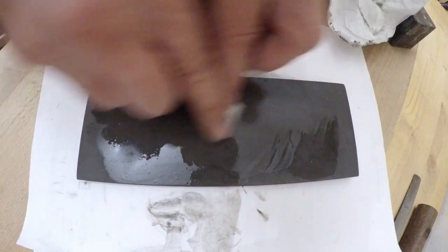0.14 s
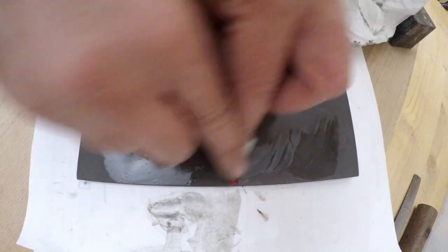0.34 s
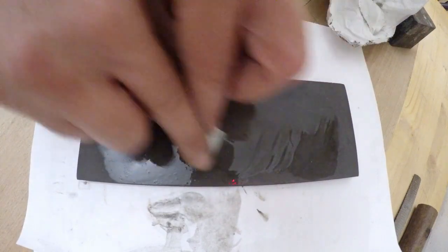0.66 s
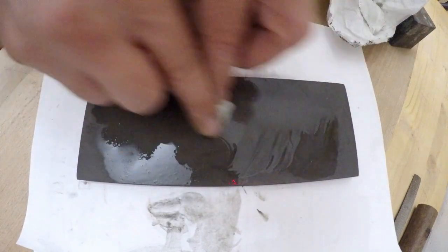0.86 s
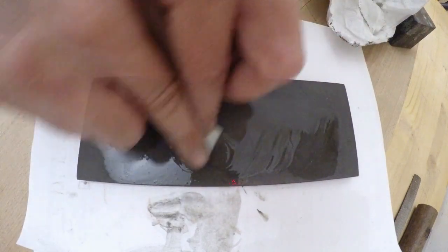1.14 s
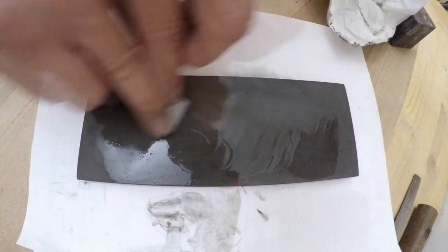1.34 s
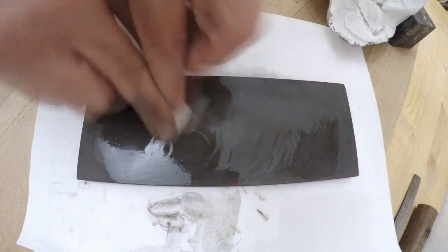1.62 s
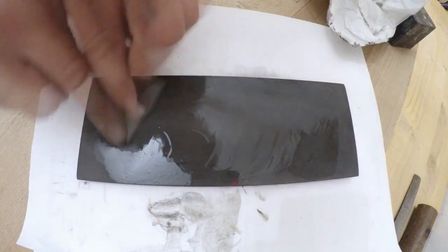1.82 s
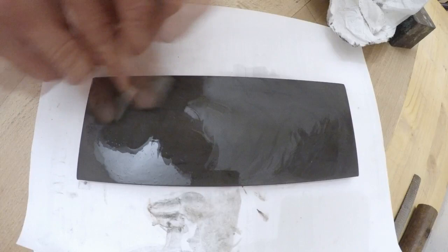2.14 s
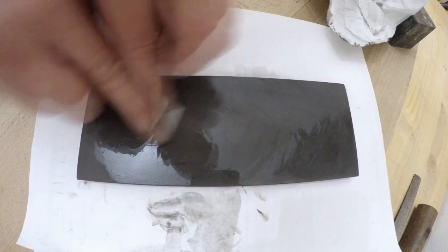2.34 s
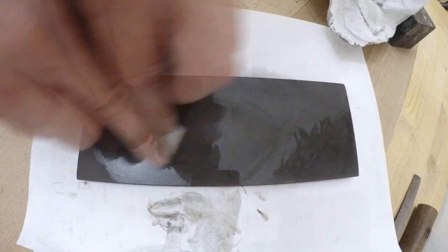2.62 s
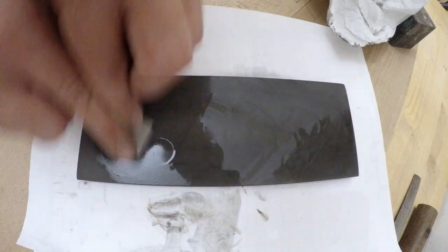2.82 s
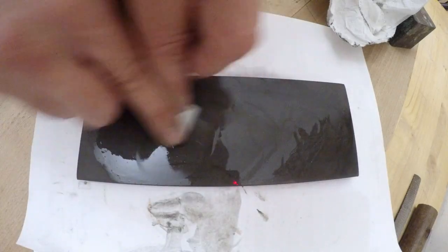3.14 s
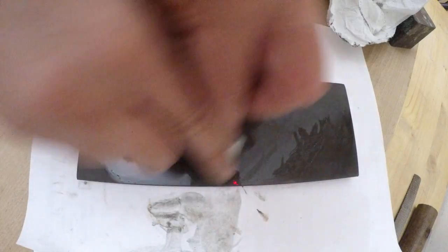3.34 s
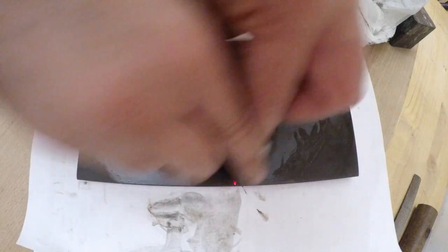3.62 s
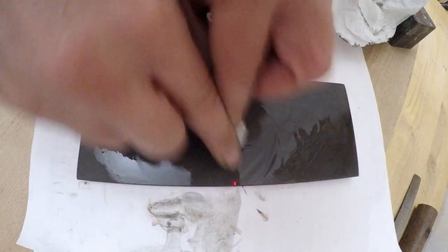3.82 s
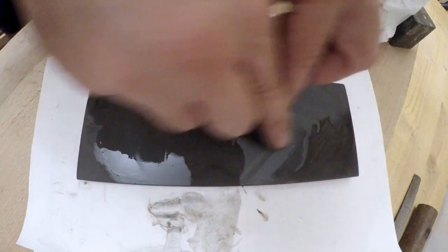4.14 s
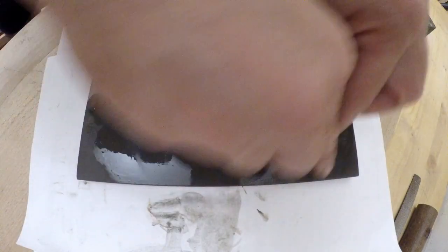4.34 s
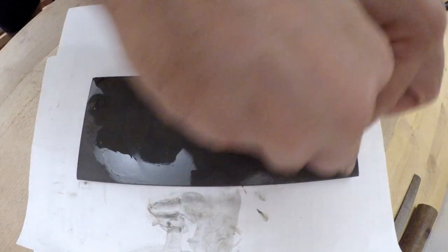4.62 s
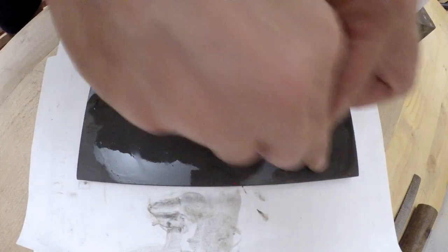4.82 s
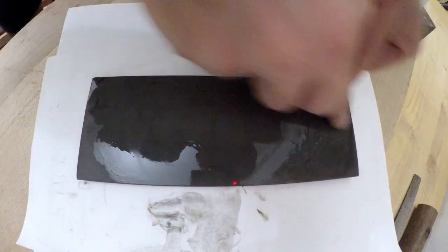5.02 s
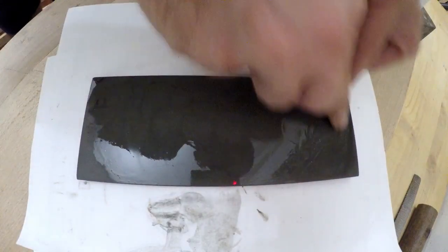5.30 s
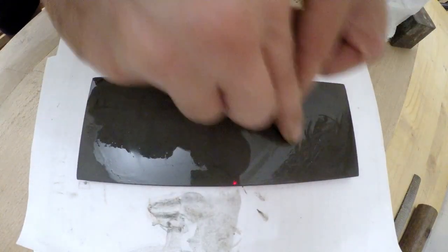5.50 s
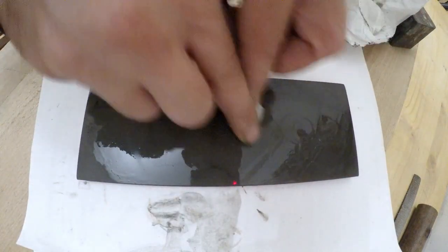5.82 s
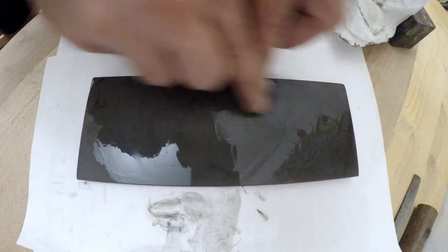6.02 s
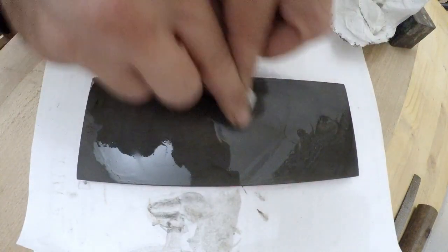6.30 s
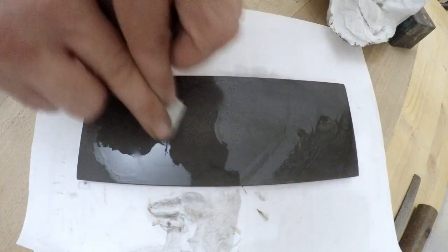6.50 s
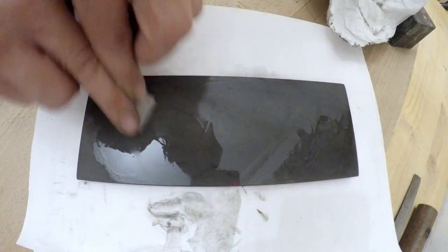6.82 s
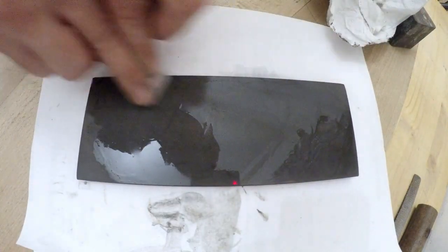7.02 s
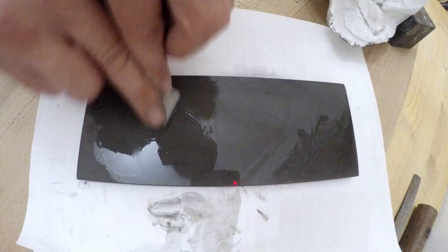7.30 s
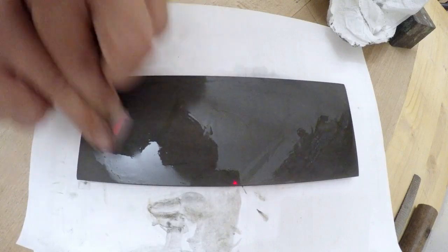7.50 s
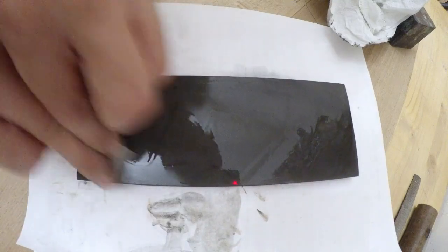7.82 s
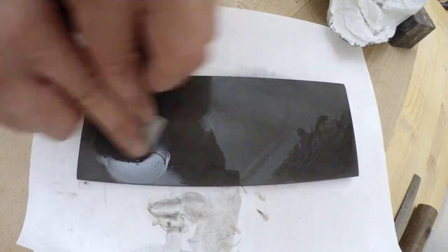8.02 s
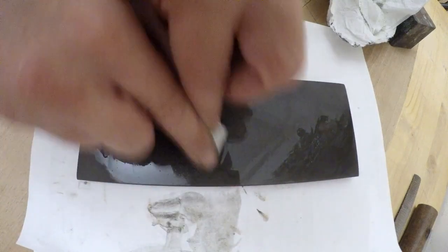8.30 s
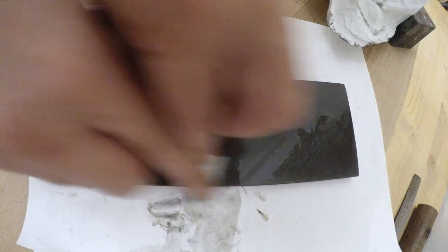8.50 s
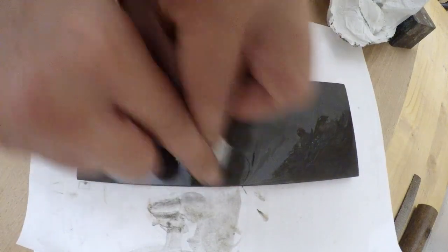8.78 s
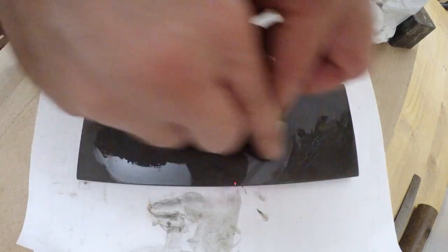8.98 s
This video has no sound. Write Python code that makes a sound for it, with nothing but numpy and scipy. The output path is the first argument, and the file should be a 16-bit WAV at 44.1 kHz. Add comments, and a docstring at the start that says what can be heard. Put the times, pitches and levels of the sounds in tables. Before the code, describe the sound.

Very close, a small steel blade is rubbed on a wet sharpening stone at about three strokes a second. Each push and return gives a bright hiss, a scrape and a nasal rasp, with thin metallic ringing. Around the middle the edge digs in harshly and squeals; later it chirps sharply. Beneath lie soft low thrums of the bench and a faint quiet-room rumble. Dry, centred sound.

```python
"""Grit hisses and rasps, close by: a small steel blade is rubbed on a wet sharpening stone, about 3 strokes/s.
Hiss, scrape and rasp are filtered grain noise; it rings the blade's modes, and the stone adds a low note.
Hands above the stone return a short, moving echo. Bench and room hum faintly: resonant and filtered noise.
Now and then the edge digs in, chatters or squeals (noise bursts, mode bursts); thrums shake the bench."""
import sys
import numpy as np
from scipy import signal
from scipy.fft import rfft, irfft, next_fast_len
from scipy.io import wavfile
from scipy.ndimage import uniform_filter1d, map_coordinates

SR = 44100
rng = np.random.default_rng(int(sys.argv[2]) if len(sys.argv) > 2 else 0)


def inscribe(sig):
    """Save sig as 16-bit PCM at rate SR to the path in sys.argv[1].

    A 1-D sig is mono; a 2-D sig holds one channel per row.
    Samples are clipped to [-1, 1] before scaling.
    """
    pcm = np.round(np.clip(np.atleast_2d(sig).T, -1, 1) * 32767)
    wavfile.write(sys.argv[1], SR, pcm.astype(np.int16))


N = 403515
TIME = np.arange(N) / SR


def gain_of(db):
    """Decibels to amplitude."""
    return 10 ** (np.asarray(db) / 20)


def evened(x):
    """Scales to unit rms."""
    return x / np.sqrt(np.mean(x ** 2) + 1e-20)


def noise():
    """White noise of unit variance."""
    return rng.standard_normal(N)


def follow(rows):
    """Columns of a curve table, interpolated at every sample."""
    s, *columns = np.transpose(rows)
    return [np.interp(TIME, s, c) for c in columns]


def colour(x, points):
    """Filters by a gain curve drawn on a log-frequency axis; unit rms."""
    hz, db = np.transpose(points)
    size = next_fast_len(N)
    bin_hz = np.fft.rfftfreq(size, 1 / SR)
    gain = gain_of(np.interp(np.log(bin_hz + 1), np.log(hz), db))
    return evened(irfft(rfft(x, size) * gain, size)[:N])


def wander(rate_hz):
    """Smooth random curve of unit rms, rate_hz random knots per second."""
    knots = rng.standard_normal(16384)
    coarse_s = TIME[::16]
    curve = map_coordinates(knots, [coarse_s * rate_hz], order=3, mode="wrap")
    return evened(np.interp(TIME, coarse_s, curve))


def uneven_gain(depth_db, rate_hz):
    """Random gain of unit rms, wandering by depth_db rms."""
    return evened(gain_of(depth_db * wander(rate_hz)))


def resonate(x, hz, width_hz):
    """Two-pole ringing mode that keeps the rms of white noise."""
    r = np.exp(-np.pi * width_hz / SR)
    zeros = np.array([1, 0, -1]) * np.sqrt((1 - r * r) / 2)
    poles = [1, -2 * r * np.cos(2 * np.pi * hz / SR), r * r]
    return signal.lfilter(zeros, poles, x)


def band(hz, width_hz):
    """Noise through one resonance twice: a fuzzy tone with steep sides."""
    once = resonate(noise(), hz, width_hz)
    return evened(resonate(once, hz, width_hz))


def held(x, hz, width_hz):
    """Mode kept going by steady rubbing: drifting phase, strength partly levelled."""
    ring = evened(resonate(x, hz, width_hz))
    power = uniform_filter1d(ring ** 2, size=1300)
    return evened(ring / np.sqrt(power + .3))


def swell(s, db, half_s):
    """Bell-shaped burst of force; half_s is the bell's standard deviation."""
    return gain_of(db) * np.exp(-.5 * ((TIME - s) / half_s) ** 2)


def bursts(rows):
    """Sum of the bells in a burst table."""
    return sum(swell(*row) for row in rows)


def swells(times, db, half_s, rest_db):
    """Level in dB of bells added in power to a resting level."""
    coarse_s = TIME[::64]
    bells = gain_of(db) * np.exp(-.5 * ((coarse_s[:, None] - times) / half_s) ** 2)
    power = (bells ** 2).sum(1) + gain_of(rest_db) ** 2
    return np.interp(TIME, coarse_s, 10 * np.log10(power))


def push_and_return(push, back, rest_db):
    """Level in dB over all strokes; push and back are each (times s, level dB, half length s)."""
    both = np.hstack([np.broadcast_arrays(*push), np.broadcast_arrays(*back)])
    return swells(*both, rest_db)


def grit(grains_per_s, spread_db, grain_db):
    """Dense fine abrasive grains, with sparser coarse ones of uneven size among them."""
    size = gain_of(spread_db * np.minimum(rng.exponential(1, N), 4))
    coarse = size * rng.choice([-1, 1], N) * (rng.random(N) < grains_per_s / SR)
    return evened(noise() + gain_of(grain_db) * evened(coarse))


RETURN_SHARE, LAST_STROKE_S = 0.55, .33  # return at this share of the way to the next push


def return_times(push_s):
    """When the blade comes back after each push, in s."""
    return push_s + RETURN_SHARE * np.diff(push_s, append=push_s[-1] + LAST_STROKE_S)


PUSH_HALF_S, RETURN_HALF_S, RETURN_SCRAPE_DB, REST_SCRAPE_DB = 0.048, 0.057, -59.5, -64
BITE_LAG_S, BITE_HALF_S, DRAG_HALF_S, REST_BITE_DB = 0.017, 0.06, 0.15, -53.5
RING_HALF_S, RETURN_RING_HALF_S, RETURN_RING_DB, REST_RING_DB = 0.043, 0.077, -3.5, -61.5
UPPER_LAG_S, UPPER_HALF_S, UPPER_RETURN_HALF_S, UPPER_RETURN_DB, REST_UPPER_DB = .015, .055, .09, -5, -82
STONE_LAG_S, STONE_RETURN_LAG_S, STONE_HALF_S, REST_STONE_DB = 0.021, 0.0039, 0.051, -88
REST_HISS_DB = -47  # where the hand turns
# push and return of the blade; levels are bell peaks before each source's trim: t/s, scrape/dB, bite/dB,
# main ring/dB, upper ring/dB, stone note/dB, return stone note/dB, return drag/dB, hiss/dB,
# lag of fastest sliding/s, half length of sliding/s
STROKE_ROWS = [(-0.08,-57,-46,-54.5,-62,-58,-70.5,-49,-44,.24,.04),
               (0.3,-48,-44,-66,-52.5,-62,-64,-48,-44,0.057,.04),
               (0.7,-53,-49.5,-81,-57,-65,-63,-79,-49.5,0.073,0.43),
               (1.06,-54,-49.5,-55,-57.5,-69,-62,-55,-45.5,0.32,0.19),
               (1.47,-54,-52,-48,-68,-68,-65.5,-48.5,-44.5,0.28,0.058),
               (1.87,-58,-48,-47.5,-76,-75,-67,-49,-43,.23,0.12),
               (2.26,-53,-49,-46,-76,-67,-74.5,-46.5,-42.5,0.1,0.2),
               (2.61,-55,-52,-45,-75,-65,-70,-56,-43.5,0.11,0.088),
               (2.91,-53.5,-51.5,-46.5,-65,-66.5,-72,-68,-42,0.095,.12),
               (3.25,-50.5,-48,-45.5,-59.5,-60,-65.5,-55,-42,0.091,0.11),
               (3.6,-49.5,-48,-60,-53,-65,-69,-53,-44,0.045,0.12),
               (3.93,-54,-45,-49.5,-58.5,-62.5,-75,-48,-42,0.03,.07),
               (4.25,-52.5,-45,-43.5,-61,-71.5,-69.5,-49,-45,0.053,0.25),
               (4.64,-49.5,-38,-44.5,-53,-57,-64.5,-50,-46.5,0.12,0.29),
               (4.97,-58,-38.5,-44,-50.5,-58.5,-70,-51,-45,0.092,0.13),
               (5.32,-61,-49,-62,-58,-55.5,-63,-53,-43.5,0.082,.11),
               (5.55,-72,-53,-48,-74,-67,-69,-48.5,-41,.13,0.1),
               (5.89,-56.5,-70,-46.5,-65,-73,-65.5,-48.5,-43,0.11,0.092),
               (6.21,-54.5,-50,-61,-60,-67.5,-63.5,-48.5,-42,0.15,0.087),
               (6.55,-54,-48,-50,-64,-66,-65.5,-48,-41.5,.12,0.082),
               (6.89,-58,-48.5,-52.5,-78,-76,-75,-46,-44,.1,.1),
               (7.21,-56,-46.5,-47,-83,-67,-68.5,-46.5,-41.5,0.1,0.21),
               (7.56,-51.5,-52,-47,-83,-68,-69,-51.5,-49,0.17,.05),
               (7.87,-50.5,-44.5,-42,-66,-66.5,-71.5,-52,-38.5,0,0.076),
               (8.2,-48.5,-44.5,-41,-60,-67,-67,-83,-43,0.031,0.18),
               (8.52,-48.5,-45,-55,-52.5,-61,-67.5,-82,-44,0.063,0.3),
               (8.86,-48.5,-42.5,-53,-55.5,-66.5,-71,-50,-43.5,0.063,0.053),
               (9.14,-50.5,-47,-50,-60,-64,-66.5,-50.5,-43,0.045,.1)]


def stroking():
    """Push and return force: levels in dB of sliding, pressure, bite, main ring, upper ring, stone note."""
    (s, scrape, bite, ring, upper, stone,
     stone_back, drag, hiss, slide_lag, slide_half) = np.transpose(STROKE_ROWS)
    back = return_times(s)
    upper_back = np.interp(back, s, upper) + UPPER_RETURN_DB
    speed_db = swells(s + slide_lag, hiss, slide_half, REST_HISS_DB)
    pressure_db = push_and_return(
        (s, scrape, PUSH_HALF_S),
        (back, RETURN_SCRAPE_DB, RETURN_HALF_S), REST_SCRAPE_DB)
    bite_db = push_and_return(
        (s + BITE_LAG_S, bite, BITE_HALF_S),
        (back, drag, DRAG_HALF_S), REST_BITE_DB)
    ring_db = push_and_return(
        (s, ring, RING_HALF_S),
        (back, drag + RETURN_RING_DB, RETURN_RING_HALF_S), REST_RING_DB)
    upper_db = push_and_return(
        (s + UPPER_LAG_S, upper, UPPER_HALF_S),
        (back, upper_back, UPPER_RETURN_HALF_S), REST_UPPER_DB)
    stone_db = push_and_return(
        (s + STONE_LAG_S, stone, STONE_HALF_S),
        (back + STONE_RETURN_LAG_S, stone_back, STONE_HALF_S), REST_STONE_DB)
    return speed_db, pressure_db, bite_db, ring_db, upper_db, stone_db


HAND_SWING_HZ, HAND_DIP_SHARE = 153, 0.44  # comb widest at this share of the stroke
# height of the hands as comb spacing of their echo, before the swing: t/s, f/Hz
HAND_ROWS = [(0, 3600), (1.1, 3750), (1.42, 4840), (1.7, 3390), (2.58, 3500), (2.85, 4530), (3.2, 3830),
             (3.6, 4020), (4.05, 3870), (4.3, 3330), (5.5, 3430), (6.25, 3920), (6.8, 3440), (8.15, 3300),
             (8.28, 4150), (9.15, 4270)]


def hand_spacing():
    """Comb spacing in Hz of the echo from the hands, which dip once in every stroke."""
    push_s = [row[0] for row in STROKE_ROWS]
    strokes_done = np.interp(TIME, push_s, np.arange(len(push_s)))
    swing = np.cos(2 * np.pi * (strokes_done - HAND_DIP_SHARE))
    return follow(HAND_ROWS)[0] + HAND_SWING_HZ * swing


def hand_echo(x, strength):
    """Very short reflection from the hands, plus weaker ones from fingers with wandering delays."""
    delays = [(strength, 1 / hand_spacing())]
    fingers = [(.2, .00038), (.2, .00052), (.15, .00075), (.13, .001), (.12, .0014), (.1, .0019)]  # gain, s
    for gain, delay_s in fingers:
        delays.append((gain, delay_s + .00005 * wander(rate_hz=8)))
    echoes = sum(g * map_coordinates(x, [np.arange(N) - SR * d], order=2) for g, d in delays)
    return evened(x + echoes)


# hiss spectrum: f/Hz, relative level/dB
HISS_COLOUR = [(1000, -26), (3000, -20), (5500, -6.5), (6500, -4.5), (7300, -1.5), (8000, 2), (8500, -1.5),
               (9000, -8.5), (9800, -10), (10700, -4.5), (11500, -4.5), (12200, -5.5), (13000, -6),
               (15300, -8)]


def hiss(speed_db, judder):
    """Sliding over fine grit hisses with speed; the hands reflect most where the blade is fastest."""
    fine = grit(grains_per_s=1500, spread_db=0.5, grain_db=-8.5)
    facing = np.clip(.37 + .03 * (speed_db - speed_db.mean()), 0, 1)
    echoed = hand_echo(colour(fine * judder, HISS_COLOUR), facing)
    return echoed * gain_of(speed_db + 1.4 * wander(rate_hz=20) - 0.46)


# scrape spectrum: f/Hz, relative level/dB
SCRAPE_COLOUR = [(100, -3.5), (300, -16), (600, -22), (1250, -20), (1520, -16), (1850, -3.5), (2100, -12),
                 (2380, 0), (2620, -11), (3000, -20.5), (3600, -14.5), (5500, -14), (9000, -25.5)]


def scrape(pressure_db, judder):
    """Pressure on coarse grit makes the low scrape."""
    coarse = grit(grains_per_s=850, spread_db=-2.0, grain_db=-4.0)
    return colour(coarse * judder, SCRAPE_COLOUR) * gain_of(pressure_db - 0.07)


# rasp spectrum: f/Hz, relative level/dB
RASP_COLOUR = [(1500, -34), (3100, -14.5), (3650, -13), (4000, -7.5), (4300, 1.5), (4620, 2), (5000, -2.5),
               (5500, -26), (7000, -13.5)]


def rasp(bite_db, judder):
    """The biting edge rasps over sharp, uneven grains."""
    sharp = grit(grains_per_s=820, spread_db=5.5, grain_db=-6.5)
    return colour(sharp * judder, RASP_COLOUR) * gain_of(bite_db - 0.85)


# where the blade works: t/s, reach (negative drawn back, positive pushed forward)
REACH_ROWS = [(0, 1.6), (.35, 1.4), (1.1, 1.3), (1.6, 0.13), (2.8, -1.5), (3.3, 1.8), (5.3, -0.18),
              (5.5, -1.7), (6.3, 0.52), (6.9, -0.21), (8, -0.37), (8.3, 0.14), (8.85, 0.66), (9.15, 0.83)]
# modes of blade and stone: f/Hz, width/Hz, level at mean force and zero reach/dB,
# share following pressure, share following bite, slope/dB per unit of reach
MODE_ROWS = [ (1346, 26, -79, .3, 1.3, 1), (4372, 32, -54.5, 0, .9, 0), (4602, 22, -56.3, .1, .8, 0),
             (5864, 19, -59, .5, .1, -1.5), (6283, 23, -57, .3, .4, -3), (6837, 35, -54.5, .4, .5, -1.5),
             (7315, 28, -52, 0, .5, -1.5), (7866, 22, -57.5, 0, .2, 1.5), (9620, 22, -64, .4, .2, 0),
             (10030, 22, -66.5, .4, 0, -1), (10701, 15, -55.5, 0, .2, -1.5), (12673, 14, -62.5, 0, .1, -1),
             (12940, 18, -62.5, 0, .1, -1), (14697, 13, -62.5, 0, 0, 1), ]


def steel(speed_db, pressure_db, bite_db, judder, coupling_db):
    """The grit rings every mode, more or less as the point of contact shifts."""
    reach, = follow(REACH_ROWS)
    speed, pressure, bite = (c - c.mean() for c in (speed_db, pressure_db, bite_db))
    out = np.zeros(N)
    for hz, width_hz, db, by_pressure, by_bite, reach_db in MODE_ROWS:
        by_speed = max(1 - by_pressure - by_bite, 0)
        force_db = by_pressure * pressure + by_bite * bite + by_speed * speed
        contact = evened(noise() * judder * gain_of(coupling_db * wander(rate_hz=14)))
        out += resonate(contact * gain_of(db + force_db + reach_db * reach), hz, width_hz)
    return out


# main bending ring: f/Hz, width/Hz, relative level/dB
RING_ROWS = [(2260, 14, 0), (2300, 60, -10)]


def blade_ring(ring_db):
    """The main bending mode swells on each stroke, in short uneven beads as the edge grips and lets go."""
    force = colour(noise(), [(1500, -30), (2150, 0), (2450, 0), (3200, -25)])  # Hz, dB
    grip = uneven_gain(2.6, rate_hz=22)
    ring = sum(gain_of(db) * held(force, hz, width_hz) for hz, width_hz, db in RING_ROWS)
    return grip * ring * gain_of(ring_db - 0.24)


UPPER_HZ, UPPER_WIDTH_HZ = 2815, 16


def upper_ring(upper_db):
    """The blade's second mode sings in uneven beads, a little after the push and weaker on the return."""
    grip = uneven_gain(3.2, rate_hz=20)
    return held(noise(), UPPER_HZ, UPPER_WIDTH_HZ) * grip * gain_of(upper_db + 2.7)


STONE_HZ, STONE_WIDTH_HZ = 851, 10


def stone_note(stone_db):
    """The stone's low mode hums in short swells under the blade."""
    uneven = uneven_gain(2.4, rate_hz=14)
    return held(noise(), STONE_HZ, STONE_WIDTH_HZ) * uneven * gain_of(stone_db + 2.8)


BENCH_HZ, BENCH_WIDTH_HZ, BENCH_DB = 166.7, 29.3, -71.5


def bench_hum():
    """The bench's resonance hums faintly throughout."""
    return gain_of(BENCH_DB) * band(BENCH_HZ, BENCH_WIDTH_HZ)


HUM_HZ, HUM_WIDTH_HZ = 65.2, 14.3
# rocking of the bench: t/s, level/dB
ROCKING_ROWS = [(0, -66.5), (3.3, -56), (3.7, -63), (4.3, -64), (4.8, -57), (6.3, -55), (6.6, -82),
                (7.5, -60.5), (9.15, -68)]


def bench_rocking():
    """The bench rocks under the strokes: a lumpy low resonance of changing level."""
    rocking_db, = follow(ROCKING_ROWS)
    lumps = gain_of(3.4 * wander(rate_hz=6))
    return gain_of(rocking_db) * evened(band(HUM_HZ, HUM_WIDTH_HZ) * lumps)


ROOM_DB = -53.5
# room spectrum: f/Hz, relative level/dB
ROOM_COLOUR = [(10, -5), (27, -1), (45, -5.5), (85, -11.5), (120, -14), (200, -19.5), (300, -25.5),
               (500, -28), (1200, -33), (8000, -38.5)]


def room():
    """Steady filtered noise: the low rumble of a quiet room."""
    return gain_of(ROOM_DB) * colour(noise(), ROOM_COLOUR)


# edge digs in: t/s, peak level/dB, half length/s
DIG_ROWS = [(0.318, -45, 0.018), (4.64, -42, 0.021), (4.704, -44, 0.022), (4.964, -33, 0.007),
            (5.047, -37.5, 0.032), (5.288, -43.5, 0.066)]
# dig spectrum: f/Hz, relative level/dB
DIG_COLOUR = [(120, 2), (300, -6), (1200, -36), (1800, -6), (2300, 8.5), (3000, -12), (3900, 9.5),
              (4900, 9), (5700, -2.5), (7500, 11.5), (9500, -15), (15000, -23)]


def digs(judder):
    """The edge digs into the stone: short bursts of gouging grains."""
    gouge = grit(grains_per_s=600, spread_db=3, grain_db=-3)
    return colour(gouge * judder, DIG_COLOUR) * bursts(DIG_ROWS)


CHATTER_TRIM_DB = -1.5
# edge chatters: t/s, peak level before trim/dB, f/Hz, half length/s
CHATTER_ROWS = [(.318, -42, 6837, .022), (1.93, -50, 6283, .025), (2.59, -44, 6283, .025),
                (2.87, -47, 6283, .03), (4.968, -36, 6283, .018), (6.55, -46, 6283, .018),
                (7.56, -43, 6283, .03), (7.835, -39, 7315, .015), (7.868, -32, 6283, .026),
                (7.882, -34, 6837, .022), (8.17, -35, 6837, .022)]


def chatter(width_hz, flutter_db, ring_width_hz, ring_db):
    """The edge sticks and slips on one mode for a moment: a short, hoarse chirp with a ringing core."""
    tones = {}
    for hz in sorted({row[2] for row in CHATTER_ROWS}):
        core = held(noise(), hz, ring_width_hz)
        tones[hz] = evened(band(hz, width_hz) + gain_of(ring_db) * core)
    chirps = sum(swell(s, db, half_s) * tones[hz] for s, db, hz, half_s in CHATTER_ROWS)
    return gain_of(CHATTER_TRIM_DB) * chirps * uneven_gain(flutter_db, rate_hz=110)


SQUEAL_HZ, SQUEAL_WIDTH_HZ = 4373, 16
# edge squeals: t/s, peak level/dB, half length/s
SQUEAL_ROWS = [(0.7, -44, 0.013), (2.19, -43, 0.048), (3.577, -41.5, 0.015), (4.01, -41, 0.042),
               (4.268, -40, 0.051), (4.55, -40.5, 0.12), (4.846, -40, 0.034), (4.952, -38.5, 0.027),
               (5.46, -40, 0.063), (5.69, -46, 0.081), (5.97, -44.5, 0.049), (7.88, -43, 0.024)]


def squeals():
    """For moments the edge holds a thin squeal on one narrow mode."""
    return held(noise(), SQUEAL_HZ, SQUEAL_WIDTH_HZ) * bursts(SQUEAL_ROWS)


# heavy strokes shake the bench: t/s, peak level/dB, half length/s
THRUM_ROWS = [(1.463, -61, 0.025), (2.592, -61, .025), (2.914, -57.5, .025), (4.583, -59.5, 0.05),
              (5.384, -53.5, 0.059), (5.734, -55.5, 0.062), (6.056, -55.5, 0.032), (7.851, -49, .03),
              (8.18, -53.5, 0.041)]


def bench_thrums():
    """Heavy strokes drive the bench's resonance in short thrums."""
    force = band(BENCH_HZ, 3 * BENCH_WIDTH_HZ)
    return held(force, BENCH_HZ, BENCH_WIDTH_HZ) * bursts(THRUM_ROWS)


def scene():
    """All friction shares one uneven contact; the sound sits in the middle."""
    speed_db, pressure_db, bite_db, ring_db, upper_db, stone_db = stroking()
    judder = evened(gain_of(0.38 * wander(rate_hz=66) + 0.65 * wander(rate_hz=300)))
    rubbing = hiss(speed_db, judder) + scrape(pressure_db, judder) + rasp(bite_db, judder) + digs(judder)
    ringing = steel(speed_db, pressure_db, bite_db, judder, coupling_db=4.0)
    ringing += blade_ring(ring_db) + upper_ring(upper_db) + stone_note(stone_db) + squeals()
    chirps = chatter(width_hz=570, flutter_db=1.4, ring_width_hz=28, ring_db=5)
    background = bench_hum() + bench_rocking() + room() + bench_thrums()
    mono = rubbing + ringing + chirps + background
    return np.array([mono, mono])


EDGE_HZ = 15330


def record(dry):
    """Band limit: linear-phase low-pass at EDGE_HZ."""
    lowpass = signal.firwin(511, EDGE_HZ, window=("kaiser", 9), fs=SR)
    return signal.oaconvolve(dry, lowpass[None], "same")


dry = scene()
out = record(dry)
inscribe(out)
```